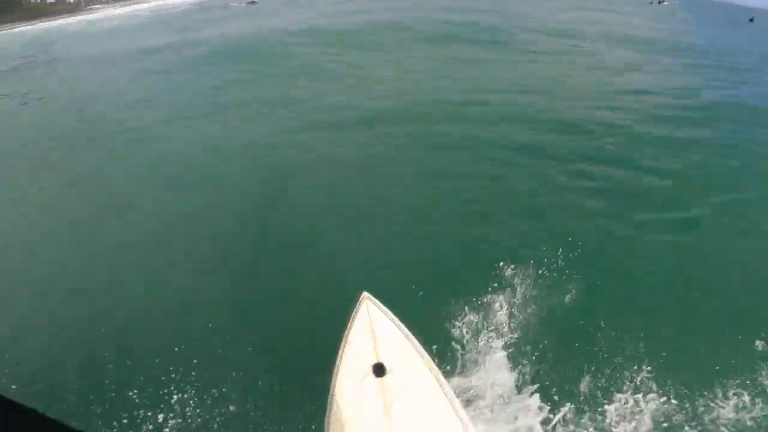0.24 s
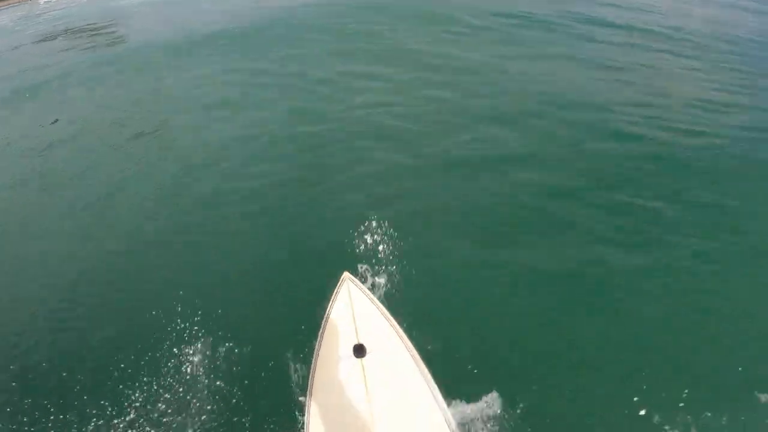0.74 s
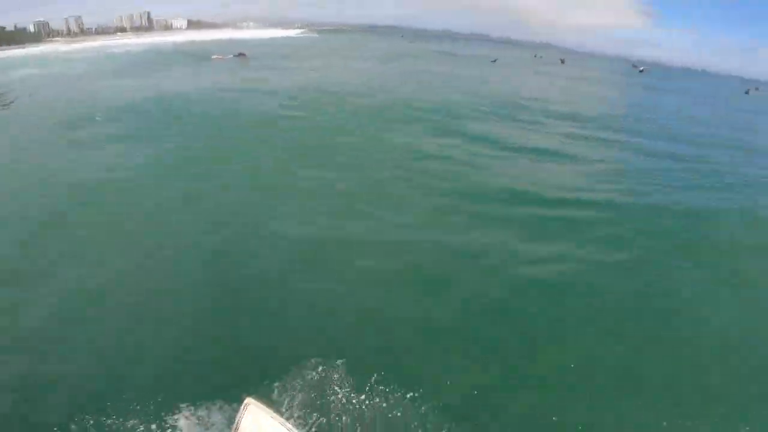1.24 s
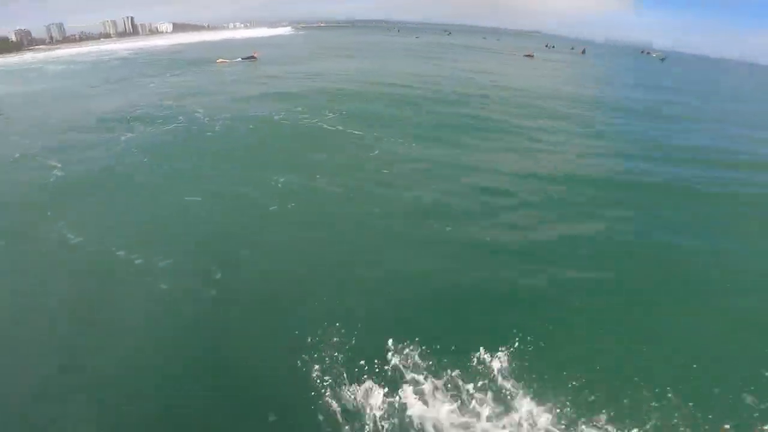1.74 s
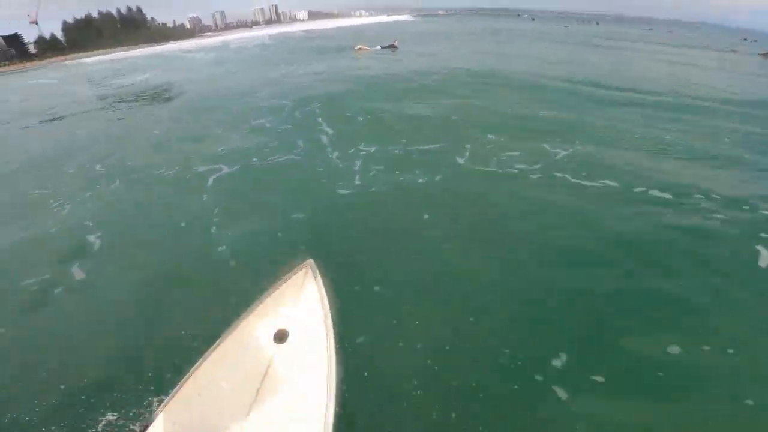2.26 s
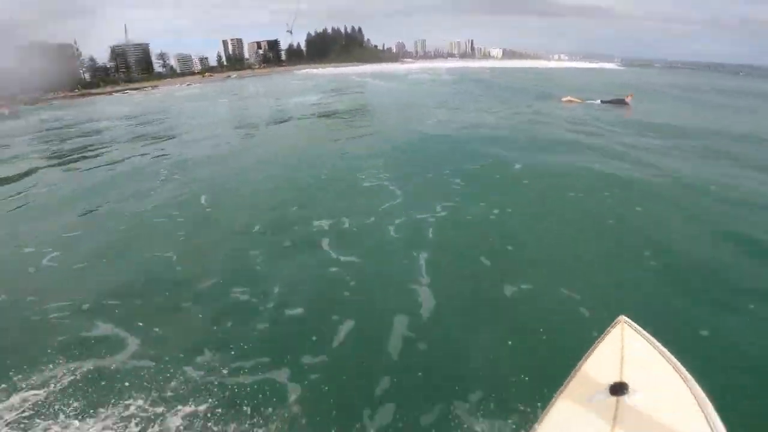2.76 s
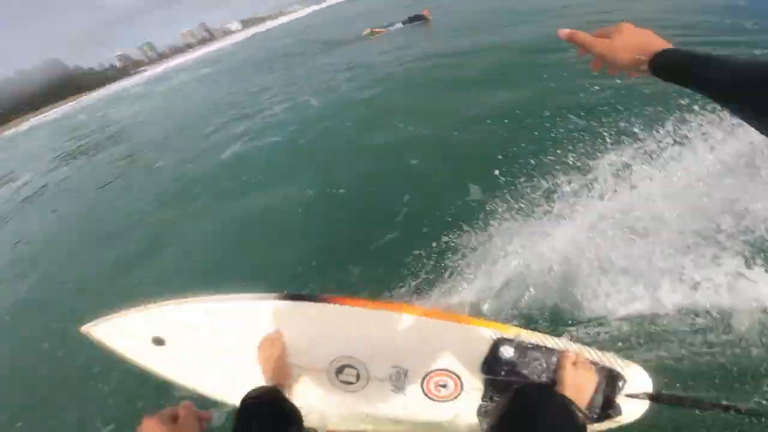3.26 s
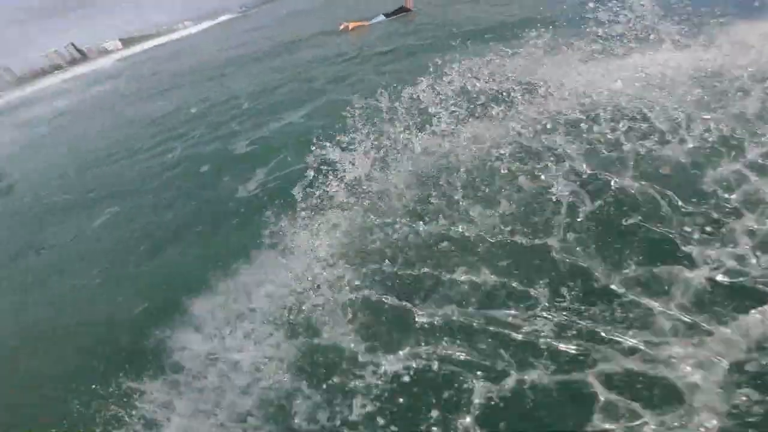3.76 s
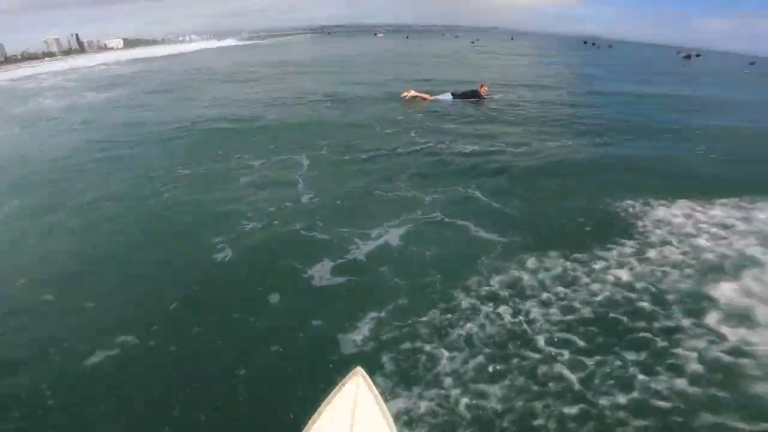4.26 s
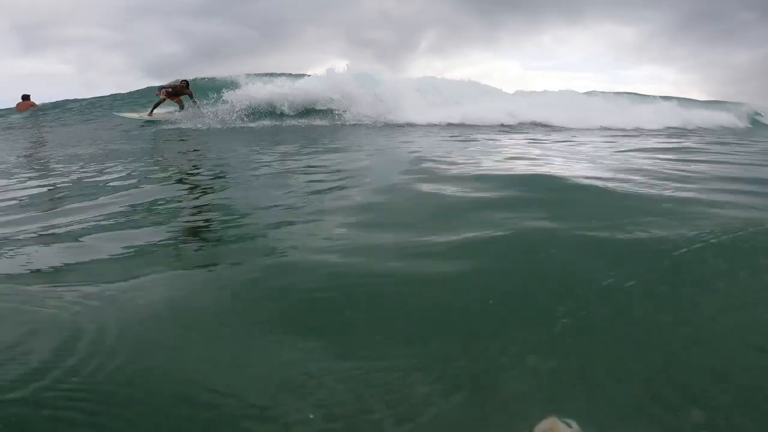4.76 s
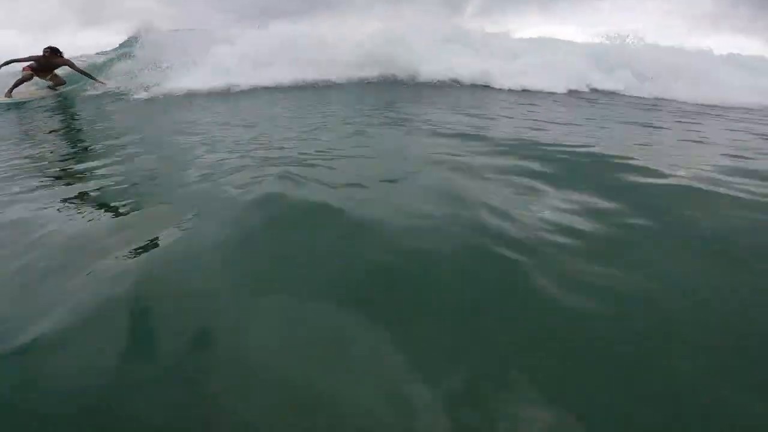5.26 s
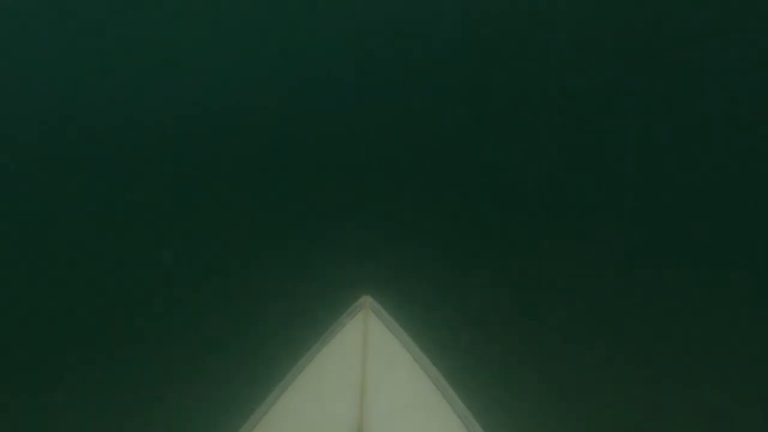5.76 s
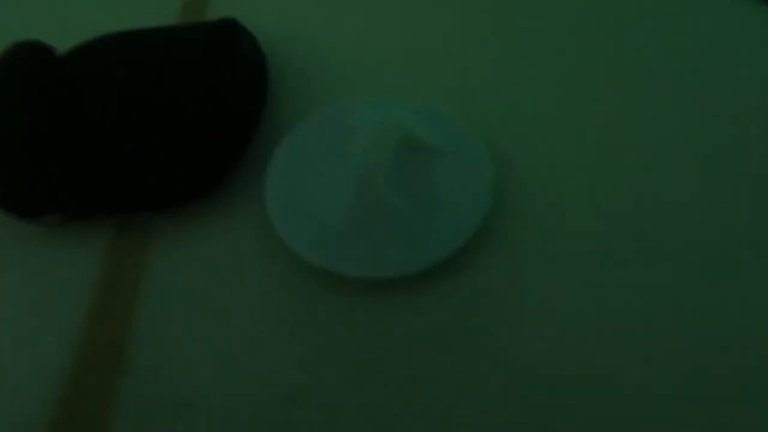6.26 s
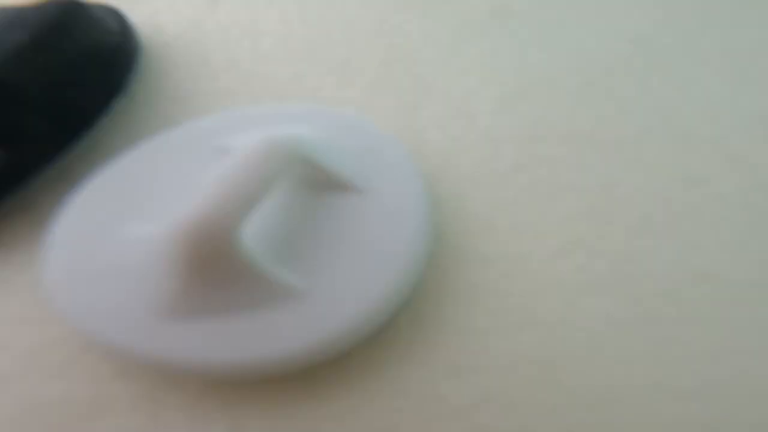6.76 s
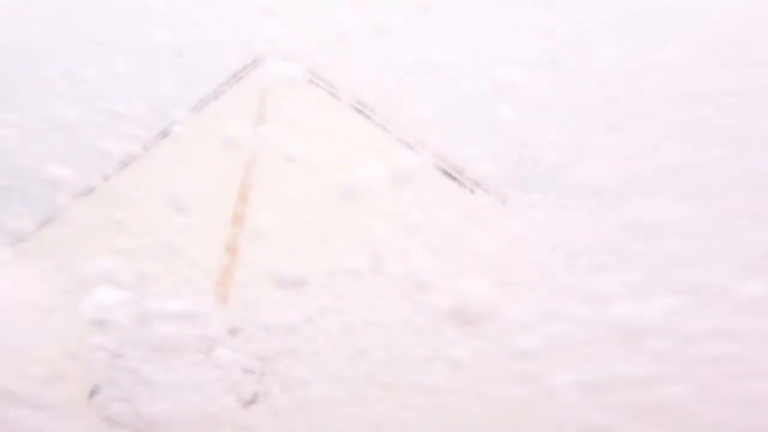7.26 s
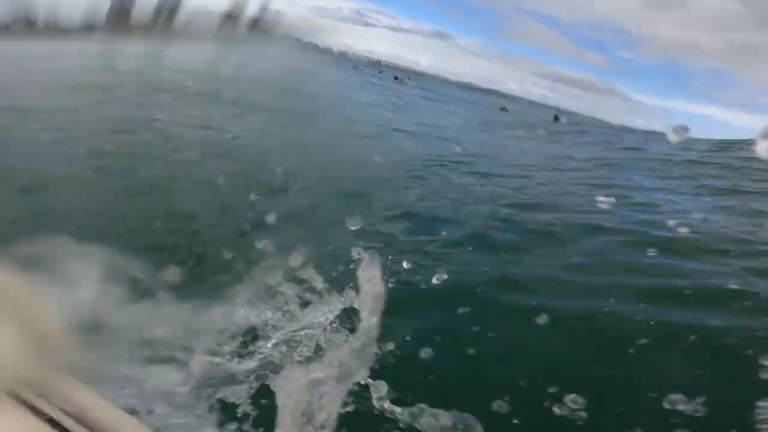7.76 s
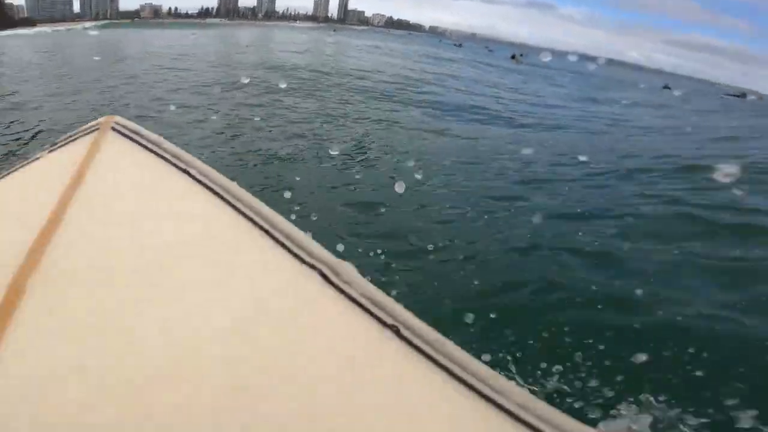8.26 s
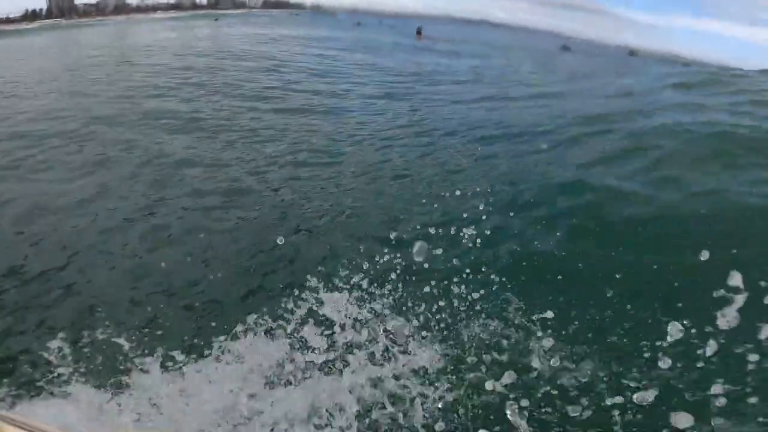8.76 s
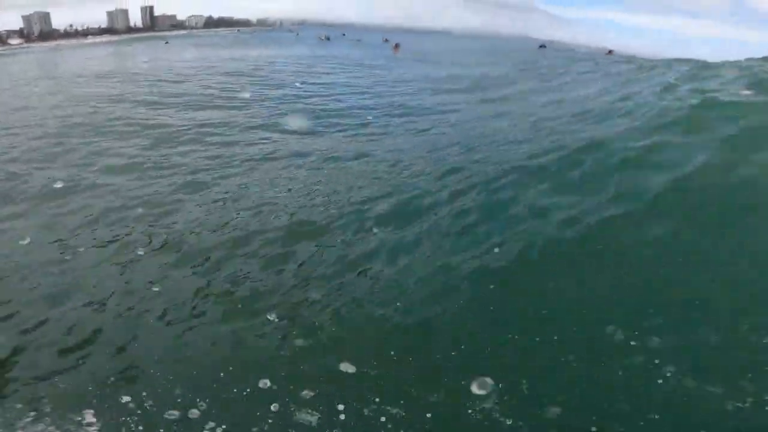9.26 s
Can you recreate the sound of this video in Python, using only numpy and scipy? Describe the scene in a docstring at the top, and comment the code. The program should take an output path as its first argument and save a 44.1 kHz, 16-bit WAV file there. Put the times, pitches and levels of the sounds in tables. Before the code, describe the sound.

Outdoors on the sea, right at the microphone: uneven wind thumps and rumbles under fizzing spray from a moving board. A burst of plops and slaps leads to denser rushing whitewater, then sudden submersion with bubbling, soft pops and hollow knocks, thinning in the middle and thickening on the way up. Finally open air again, blustery wind and wet splashes, hissing mainly on the right.

```python
"""Wind buffets the two microphone ports of a small camera that rides with a surfer; spray hisses off the board.
The camera then floats in front of a breaking wave, is pushed under it (muffled bubbling, ticks on the
housing) and surfaces into wind and splashes again. The left port is hollow and dull, the right one bright.
Wind and water are noise shaped by spectra and level curves; drops, bubbles and hoots are ringing or gliding
sines; knocks, thumps and slaps are short pulses and bursts."""
import sys
import numpy as np
from scipy import signal
from scipy.fft import rfft, irfft, next_fast_len
from scipy.io import wavfile
from scipy.ndimage import uniform_filter1d

SR = 44100
rng = np.random.default_rng(int(sys.argv[2]) if len(sys.argv) > 2 else 0)


def write(x):
    x = np.atleast_2d(x).T
    wavfile.write(sys.argv[1], SR, np.round(np.clip(x, -1, 1) * 32767).astype(np.int16))


N = 419391
T = np.arange(N) / SR   # s
SIZE = next_fast_len(N, real=True)   # transform length, samples
HZ = np.float32(np.maximum(np.arange(SIZE // 2 + 1) * SR / SIZE, 1))   # frequency of each bin

# The four stages: each from and to, in seconds.
RIDE, FLOAT, DIVE, PADDLE = (0, 4.48), (4.48, 5.715), (5.715, 7.617), (7.617, 9.52)

# All levels in the tables are relative; the functions set each layer's own level. Gusts of air and shoves of
# water. Each row: middle in seconds, length in seconds, lift in dB, pitch of their eddies in Hz, dB by which
# the spray dips during the gust.
GUST_ROWS = [(0.067, 0.125, 2.5, 560.0, 0.0), (0.386, 0.086, 2.0, 220.0, 2.5),
             (0.757, 0.079, 3.0, 70.0, 0.0), (0.924, 0.177, 4.5, 380.0, 9.0),
             (1.422, 0.074, 2.5, 160.0, 3.0), (1.575, 0.113, 4.5, 150.0, 0.0),
             (1.685, 0.11, 4.5, 150.0, 3.0), (2.001, 0.153, 2.0, 60.0, 0.0),
             (2.286, 0.114, 5.5, 190.0, 0.0), (2.44, 0.133, 4.5, 60.0, 0.0), (3.042, 0.102, 2.0, 70.0, 0.0),
             (3.229, 0.055, 5.0, 150.0, 0.0), (3.516, 0.111, 4.0, 220.0, 5.0),
             (3.599, 0.096, 4.5, 640.0, 1.5), (3.678, 0.061, 6.5, 80.0, 5.0),
             (3.808, 0.132, 5.5, 180.0, 3.0), (4.285, 0.121, 2.5, 530.0, 0.0),
             (4.581, 0.093, 3.5, 230.0, 0.0), (4.68, 0.055, 7.0, 80.0, 1.5), (5.825, 0.14, 6.5, 500.0, 0.0),
             (6.194, 0.08, 5.0, 70.0, 0.0), (6.393, 0.049, 3.5, 230.0, 0.0), (6.6, 0.3, 3.5, 60.0, 0.0),
             (6.679, 0.084, 5.0, 150.0, 0.0), (6.799, 0.152, 2.0, 740.0, 0.0),
             (6.987, 0.193, 5.5, 50.0, 0.0), (7.274, 0.12, 4.0, 140.0, 0.0), (7.505, 0.05, 5.0, 740.0, 0.0),
             (7.755, 0.07, 6.0, 140.0, 2.5), (7.942, 0.113, 4.0, 210.0, 0.0),
             (8.255, 0.144, 3.0, 60.0, 0.0), (8.733, 0.094, 4.0, 130.0, 0.0),
             (9.057, 0.086, 2.5, 140.0, 3.5), (9.115, 0.07, 4.5, 60.0, 0.0)]
# The flow breaks off for a moment. Each row: middle in seconds, length in seconds, dB lost, dB lost by the rumble.
LULL_ROWS = [(1.235, .055, 3, 1), (1.76, 0.033, 6, 9), (1.817, 0.096, 1, 6), (2.884, .119, 1.5, 4),
             (3.308, 0.058, 2.5, 10), (3.394, 0.032, 6, 8), (4.48, 0.01, 8, 5), (4.734, 0.079, 7, 6),
             (5.709, 0.021, 12, -2), (5.738, .012, 8, 4), (5.912, 0.02, 8, 0), (5.964, 0.013, 7, 1),
             (5.99, 0.14, 1, 4.5), (6.047, 0.029, 9, 7), (6.095, 0.019, 8, 4), (6.132, 0.014, 5, 1),
             (6.185, .014, 5, -2), (6.252, 0.029, 7, 3), (6.278, .01, 8, 2), (6.3, 0.035, 5, 0.5),
             (6.336, 0.018, 4, -2), (6.403, .012, 6, 3), (6.424, 0.041, 7, 5), (6.466, .018, 3, -1),
             (6.49, .012, 3, 3), (6.59, 0.023, 3, -1), (6.935, .085, 10.5, 1), (7.103, 0.023, 7, 2),
             (7.128, 0.03, 6, 9), (7.184, .012, 5, 0), (7.226, 0.02, 4, -1), (7.345, .016, 3, 2),
             (7.554, .03, 2, 1), (7.602, 0.029, 13, 12), (9.438, 0.19, 0.5, 3.5)]
# Bubbles that burst on the housing. Each row: time in seconds, tick level in dB, thud level in dB.
BURST_ROWS = [(5.750, -22, -30), (5.764, -21, -11), (5.812, -27, -11), (5.823, -31, -13), (5.853, -33, -14),
              (5.887, -25, -9), (5.895, -32, -15), (5.922, -41, -21), (5.950, -35, -17), (5.979, -31, -16),
              (6.009, -43, -13), (6.029, -43, -24), (6.042, -45, -26), (6.069, -36, -8), (6.11, -45, -19),
              (6.147, -40, -18), (6.164, -37, -9), (6.196, -45, -17), (6.213, -45, -19), (6.241, -47, -26),
              (6.268, -39, -13), (6.283, -47, -34), (6.318, -37, -9), (6.348, -47, -24), (6.376, -41, -8),
              (6.386, -42, -22.5), (6.409, -52, -20), (6.415, -56, -30), (6.433, -60, -30),
              (6.477, -66, -17), (6.502, -73, -20), (6.587, -60, -26), (6.604, -68, -17), (6.626, -57, -30),
              (6.665, -57, -33), (6.714, -67, -22), (6.756, -69, -21), (6.863, -34, -3), (6.913, -47, -24),
              (6.926, -55, -34), (6.982, -36, -16), (7.013, -34, -22), (7.028, -33.5, -24),
              (7.044, -33, -21), (7.064, -35, -27), (7.07, -37, -10.5), (7.083, -41, -27),
              (7.117, -58, -14), (7.192, -33, -8), (7.241, -34, -20), (7.247, -36, -24), (7.258, -34, -23),
              (7.274, -35, -15), (7.297, -36, -19), (7.308, -35, -21), (7.358, -47, -13), (7.377, -49, -16),
              (7.42, -49, -10), (7.445, -42, -16), (7.468, -43, -25), (7.488, -40, -18), (7.518, -35, -12)]
# Spectrum of the white water after surfacing. Each row: frequency in Hz, density in dB per Hz.
SURFACE_SPRAY = [(1000, -3.5), (1280, -10), (1900, -14.5), (2650, -13.5), (3100, -11), (3550, -14.5),
                 (4450, -10), (5500, -17.5), (6770, -21), (7400, -27.5), (8300, -37.5), (9500, -40),
                 (10500, -46), (12300, -53)]
# Spectrum of the bubbles under water. Each row: frequency in Hz, density in dB per Hz.
BUBBLE_COLOUR = [(600, -15), (900, -3), (1120, 2.5), (1300, -1), (1480, -10), (1700, -11), (2100, -20),
                 (2700, -28.5), (3600, -34.5), (4600, -38.5), (7000, -53), (10000, -70.5), (15000, -79)]
# Left port against the right one for sound through air. Each row: frequency in Hz, ratio in dB.
LEFT_THROUGH_AIR = [(1000, 10), (1400, 1), (2000, -1.5), (3000, -5), (3600, -7), (4300, -15.5),
                    (4750, -21.5), (5200, -49.5), (8000, -41)]
# Left port against the right one for sound through water. Each row: frequency in Hz, ratio in dB.
LEFT_THROUGH_WATER = [(800, 8.5), (1200, -1), (2000, -1), (4000, -5)]
# Phase by which the left port lags in air. Each row: frequency in Hz, lag in radians.
LAG_IN_AIR = [(170, -0.5), (400, 0.5), (600, 1.24), (790, 2.0), (1000, 4), (1400, 4.5), (2500, 4.7)]
# Phase by which the left port lags in water. Each row: frequency in Hz, lag in radians.
LAG_IN_WATER = [(120, -0.14), (300, -0.21), (650, 0.064), (950, -1.57)]
# Likeness of gusty flow at the two ports. Each row: frequency in Hz, shared amplitude 0-1.
GUSTY_LIKENESS = [(40, 0.63), (300, 0.51), (650, 0.72), (850, 0.43), (1200, 1)]


def flow(stage, levels, streams, colour, likeness, lag, top_hz, rumble_db, buffet_db, hollow_db, even_s=0.095):
    """Turbulence by eddy size: big eddies rumble, smaller ones buffet and excite the hollow port."""
    # The big eddies swing from port to port as the camera turns.
    # Each row: time in seconds, left against right in dB.
    rumble_side = [(0, -1), (.35, 3), (.62, -2.5), (.9, 1.5), (1.35, -3), (1.68, 6), (1.95, -2),
                   (2.23, -3.5), (2.7, 3.5), (3.1, -1), (3.83, 4.5), (4.1, -5.5), (4.4, -7.5), (4.65, 3.5),
                   (4.85, -1), (6.1, -1.5), (6.35, 4.5), (7.05, 5), (7.7, -2), (8.3, 1.5), (8.55, -5),
                   (8.95, -9), (9.1, -1), (9.5, -6)]
    rumble, buffet, side, hollow = levels
    spectra = ports(streams, in_hz(colour), in_hz(likeness)[0], lag) * below(top_hz, order=8)
    big, medium = below(113), below(396)
    low = play(spectra * big, rumble + rumble_db, 20, 120)
    middle = play(spectra * (medium - big), buffet + buffet_db, 140, 380, even_s)
    high = play(spectra * (1 - medium), hollow + hollow_db, 450, 1000, even_s)
    turned_low = ports_turned(in_time(rumble_side)[0], stage, 0.5) * low
    return turned_low + ports_turned(side, stage, 0.3) * (middle + high)


def wind_levels(rumble_hz, buffet_hz, hollow_hz, unrest_db):
    """One flow drives all its eddies: its gusts and lulls set rumble, buffeting, side and hollow port, in dB."""
    # Strength of the air or water that streams over the ports. Each row: time in seconds, level in dB.
    wind_curve = [(0.0, -23.5), (1.305, -25.0), (2.151, -27.0), (2.799, -26.5), (3.696, -26), (4.139, -29),
                  (4.741, -25.5), (5.085, -21.5), (5.66, -18), (5.829, -20), (5.991, -24), (6.896, -29),
                  (7.395, -21.5), (7.632, -27.5), (8.522, -27.0), (9.051, -23), (9.51, -22)]
    # The side that faces the flow. Each row: time in seconds, left against right in dB.
    facing_curve = [(0.0, 5), (0.6, 3.5), (0.9, 5), (1.15, 3), (1.6, 6), (2.25, 3), (2.85, 2), (3.3, 4),
                    (3.8, 6), (4.05, 2.5), (4.4, 2), (5.5, 1.5), (5.8, 10.5), (6.05, 2.5), (6.35, 11),
                    (7.05, 11.5), (7.17, 2), (7.5, 3), (7.8, 13), (8.15, 9.5), (8.9, 9), (9.51, 8.5)]
    usual_wind_db = -25   # at this strength rumble and hollow port have the base levels below
    rumble_base_db, rumble_follows = -23, 0.13   # the second is the share of the wind's swing they follow
    hollow_base_db, hollow_follows = -28, 0.5
    gust_turn = 0.32   # dB towards the left port for each dB of gust

    (wind,), (facing,) = in_time(wind_curve), in_time(facing_curve)
    swing = wind - usual_wind_db
    lull = swells(row[:3] for row in LULL_ROWS)
    rumble_lull = swells((s, length, lost) for s, length, _, lost in LULL_ROWS)
    gust = gusts_at(buffet_hz)
    rumble = rumble_base_db + rumble_follows * swing + gusts_at(rumble_hz) - rumble_lull
    buffet = wind + gust - lull + unrest_db * drift(10)
    hollow = hollow_base_db + hollow_follows * swing + gusts_at(hollow_hz) - lull
    return rumble, buffet, facing + gust_turn * gust, hollow


def gusts_at(hz):
    """A gust lifts eddies near its own pitch most, along a bell curve in octaves; lift in dB."""
    spread_octaves = 0.95
    return swells((s, length, db * np.exp(-(np.log2(hz / eddy_hz) / spread_octaves) ** 2 / 2))
                  for s, length, db, eddy_hz, _ in GUST_ROWS)


def eddies(lumpy_db, rate):
    """Intermittent turbulence: two unrelated noise streams that come in the same lumps."""
    return rng.standard_normal((2, N)) * from_db(lumpy_db * drift(rate))


def ports_turned(side_db, stage, left_share):
    """Level difference between ports: their gains as the flow swings away from its mean side in a stage."""
    turn_db = side_db - np.average(side_db, weights=during(stage))
    return from_db(np.array([[left_share], [left_share - 1]]) * turn_db)


def hoots():
    """Vortex shedding: the wind sheds regular vortices off the camera and hoots briefly."""
    # Each row: middle in seconds, length in seconds, level in dB, Hz at the start and at the end of that length.
    whirl_rows = [(0.78, .05, -17.5, 70, 120), (0.83, .06, -20, 209.6, 222), (0.92, .05, -21.5, 241.6, 271),
                  (1.16, .07, -21, 317.5, 495), (1.575, .06, -18.5, 290, 197),
                  (1.61, .04, -17.5, 109.6, 130), (1.675, .06, -17.5, 215.8, 181),
                  (1.705, 0.0502, -15, 109.3, 95), (3.68, 0.055, -18, 130, 110.7),
                  (7.81, .04, -21, 293, 261), (7.875, .03, -21.5, 200, 210), (7.93, .04, -20.5, 788, 853),
                  (7.97, .05, -19.5, 279, 267)]
    return gliding_tones(whirl_rows, level_db=1.5, lag=LAG_IN_AIR, wobble=0.06, flutter_db=3.0)


def white_water(levels, colour, drops, drop_db, flicker_db, splash_db, spray_db):
    """Many small impacts add up to noise: droplets over a hiss, coarse splashes lower than fine spray."""
    splash, spray = levels
    hiss = rng.standard_normal((2, N))
    streams = (hiss + from_db(drop_db) * drops) * from_db(flicker_db * drift(35))
    colour_db = in_hz(colour) + in_hz(LEFT_THROUGH_AIR) * [[1], [0]]
    spectra = ports(streams, colour_db, 0.9, LAG_IN_AIR) * (1 - below(920))
    coarse = below(2530, order=8)
    splashes = play(spectra * coarse, splash + splash_db, 1300, 2400)
    return splashes + play(spectra * (1 - coarse), spray + spray_db, 2800, 7500)


def water_levels(unrest_db):
    """Splash and spray in dB: both dip while gusts blow and rise in surges, the coarse splash most."""
    # Hiss of the white water, before and after the dive. Each row: time in seconds, level in dB.
    spray_curve = [(0.0, -32.0), (0.752, -30), (1.252, -31.5), (1.769, -40), (1.95, -32.0), (2.545, -33.0),
                   (2.84, -28), (3.399, -28.5), (3.47, -31), (3.861, -29.5), (4.046, -25.5), (4.449, -30),
                   (4.76, -32), (4.85, -26.5), (5.653, -25.5), (5.715, -44), (7.62, -40), (7.796, -38),
                   (8.124, -33), (8.651, -32), (9.201, -34.0), (9.51, -39.0)]
    # Sheets of water thrown up by the board or the wave. Each row: middle in seconds, length in seconds, lift in dB.
    surge_rows = [(0.182, 0.042, 4), (0.295, 0.062, 1), (0.593, 0.053, 2.5), (1.125, 0.15, 2.5),
                  (1.536, 0.16, 1), (1.914, 0.096, 3), (2.153, 0.12, 3), (2.462, 0.11, 3.5),
                  (2.651, 0.059, 4), (4.534, 0.055, 3), (4.619, 0.045, 4.5), (4.793, 0.023, 2),
                  (7.63, 0.053, 4.5), (7.74, 0.034, 5), (8.318, 0.071, 3.5), (8.612, 0.088, 2),
                  (8.962, 0.064, 2), (9.111, 0.049, 1.5), (9.211, 0.048, 2)]
    coarse_db, coarse_in_surge = -9.5, 0.59   # splash against spray; extra dB for each dB of surge

    (spray,), surge = in_time(spray_curve), swells(surge_rows)
    receding = swells((s, length, max(lost, 0)) for s, length, _, _, lost in GUST_ROWS)
    spray = spray + surge - receding + unrest_db * drift(7.9)
    return spray + coarse_db + coarse_in_surge * surge, spray


def droplets():
    """Random impacts: fine drops fall all the time, heavy ones crackle where water breaks up close by."""
    # Each row: middle in seconds, length in seconds, lift of the heavy drops in dB.
    splatter_rows = [(1.12, 0.16, 11), (2.88, .2, 9.5), (4.62, .28, 15), (8.5, .5, 7)]
    heavy_db = -8.5   # heavy drops against fine ones, outside the splatters
    fine = grains(per_s=2200, low_hz=1200, high_hz=7110, cycles=10.2, spread_db=4.0)
    heavy = grains(per_s=420, low_hz=1200, high_hz=7000, cycles=6.3, spread_db=3.0, count=8)
    drops = fine + from_db(heavy_db + swells(splatter_rows)) * heavy
    return np.array([drops, np.roll(drops, SR // 50)])


def plops(level_db):
    """Bubble resonance: each drop traps a bubble that rings and glides; high ones reach mostly the right port."""
    # Each row: start in seconds, level in dB, pitch in Hz, cycles until the ring is 60 dB down,
    # pitch glide as a share.
    plop_rows = [(2.022, -19, 1490, 12, -0.054), (4.493, -11, 4580, 22, -0.0098),
                 (4.504, -9, 3540, 24, -0.0086), (4.527, -10, 3190, 26, .05), (4.539, -13.5, 1276, 22, .14),
                 (4.546, -11, 5000, 24, -0.029), (4.556, -6.5, 4700, 18, 0.011),
                 (4.563, -21, 800, 9.1, .05), (4.572, -15, 5650, 18, .05), (4.603, -10, 4000, 22, .05),
                 (4.613, -15.5, 1150, 11, .05), (4.629, -8, 3850, 30, .05), (4.634, -12, 5700, 16, .05),
                 (4.655, -18, 5600, 18, .05), (4.667, -15, 4300, 18, .05), (4.675, -14.5, 3600, 28, .05),
                 (4.697, -17, 5000, 22, 0.02), (4.64, -5.5, 4290, 30, .05), (4.709, -4, 3800, 29, .05),
                 (4.723, -12.5, 5220, 16, 0.11), (5.664, -18, 4020, 34, 0.1),
                 (5.701, -25.5, 3170, 140, -0.36), (5.751, -12.5, 1900, 7.2, .08),
                 (5.759, -14.5, 2110, 9.9, 0.14), (5.764, -4, 1380, 14, .08),
                 (5.785, -12, 1154, 14, -0.022), (5.979, -9.5, 1300, 18, -0.067),
                 (6.028, -14, 2320, 16, -0.02), (6.146, -12, 1570, 24, 0.052),
                 (6.241, -18.5, 1550, 12, .03), (6.268, -15, 1145, 15, 0.0023),
                 (6.321, -25.5, 1100, 14, .03), (6.626, -23.5, 1700, 19, 0.01),
                 (6.665, -24, 1680, 23, -0.028), (6.736, -44.5, 2600, 27, 0.0052),
                 (6.86, -18.5, 1250, 10, -0.01), (7.168, -17.5, 1300, 20, .05),
                 (7.266, -21.5, 2240, 20, .05), (7.327, -11, 1680, 20, 0.0037), (7.359, -16, 1150, 16, .05),
                 (7.374, -17.5, 1200, 16, .05), (7.402, -17.5, 1170, 16, .05),
                 (7.445, -11, 1360, 20, -0.034), (7.469, -11.5, 1200, 16, .03),
                 (7.508, -10, 1135, 18, -0.034), (7.578, -15, 1200, 18, 0.0069),
                 (7.625, -16.5, 820, 16, .08), (7.661, -12, 613, 5.5, -0.027),
                 (8.032, -13.5, 4380, 33, -0.094), (8.115, -20.5, 3100, 26, .05),
                 (8.441, -10.5, 4590, 49, .05), (8.578, -19, 4480, 30, .05), (8.628, -14, 4600, 36, .05),
                 (8.68, -17, 3150, 30, .05), (9.17, -21, 3000, 30, .05), (9.205, -18.5, 2900, 28, .05)]
    out, t = np.zeros(N), T[:SR // 10]
    for s, db, hz, cycles, glide in plop_rows:
        start, age = round(s * SR), t * hz / cycles
        gliding_hz = hz * (1 + glide * np.minimum(4 * age, 1))   # levels off after a quarter of the ring
        phase = 2 * np.pi * np.cumsum(gliding_hz) / SR
        onset = (1 - np.exp(-25 * age)) ** 2
        out[start:start + len(t)] += from_db(db + level_db - 60 * age) * onset * np.sin(phase)
    return drops_at_ports(out)


def slaps(level_db):
    """Impulsive noise: sheets of water slap the camera in short bursts of spray that die at once."""
    # Each row: start in seconds, level in dB, decay in seconds.
    slap_rows = [(1.048, -32, .035), (2.11, -35, .02), (2.345, -35, 0.013), (4.49, -23, 0.011),
                 (4.555, -20, .003), (4.604, -24, 0.014), (4.638, -21, 0.0034), (5.662, -22.5, .01),
                 (7.618, -22.5, 0.0082), (8.437, -25, 0.0069)]
    rise_s = 0.0037
    strength = np.zeros(N)
    for s, db, decay in slap_rows:
        fade = np.exp(-np.minimum(np.abs(T - s) / decay, 20))
        strength += from_db(db + level_db) * np.clip((T - s) / rise_s, 0, 1) * fade
    colour_db = in_hz(SURFACE_SPRAY) + in_hz(LEFT_THROUGH_AIR) * [[1], [0]]
    spectra = ports(rng.standard_normal((2, N)), colour_db, 0.72, LAG_IN_AIR)
    return strength * rms_one(irfft(spectra * (1 - below(1800)), SIZE)[:, :N])


def showers(level_db, pitch_spread):
    """Like-sized drops ring alike: each shower is a short patter around one pitch."""
    # Each row: middle in seconds, length in seconds, level in dB, pitch in Hz.
    shower_rows = [(7.738, 0.032, -34.5, 3920), (7.98, .07, -32, 3780), (8.118, .03, -31, 5080),
                   (8.216, .035, -33.5, 3100), (8.318, .06, -40, 1890), (8.422, .04, -34, 1390),
                   (8.625, .06, -30.5, 4770), (8.65, .08, -34.5, 3200), (8.89, 0.046, -34.5, 3100),
                   (8.985, 0.046, -33, 2910), (9.09, .045, -31.5, 3100), (9.11, .035, -34, 4200)]
    patter = np.zeros(N)
    for s, length, db, hz in shower_rows:
        drops = grains(per_s=900, low_hz=hz / pitch_spread, high_hz=hz * pitch_spread,
                       cycles=22, spread_db=2.5, count=3)
        patter += from_db(db + level_db) * swells([(s, length, 1)]) * drops
    return drops_at_ports(patter)


def drops_at_ports(x):
    """Fully coherent sound through air: one signal reaches both ports with their difference in level and phase."""
    spectra = ports([x, x], in_hz(LEFT_THROUGH_AIR) * [[1], [0]], 1, LAG_IN_AIR)
    return irfft(spectra * below(7000, order=8), SIZE)[:, :N]


def thumps(level_db):
    """Pressure pulse: a lump of air or water on the ports is one push with a rebound on either side."""
    # Each row: middle in seconds, level in dB, width in seconds.
    thump_rows = [(3.266, -9, 0.0023), (3.368, -6.5, 0.0014), (3.439, -13, 0.0018), (5.728, -2, 0.00042),
                  (5.744, -8, 0.0012)]
    out = np.zeros(N)
    for s, db, width in thump_rows:
        near = np.abs(T - s) < 10 * width
        spread = ((T[near] - s) / width) ** 2 / 2
        out[near] += from_db(db + level_db) * (1 - spread) * np.exp(-spread)
    return out


def under_water(levels, puff_share):
    """Pressure of bursting bubbles: the same flow under water, where each burst also shoves the ports."""
    rumble, buffet, side, hollow = levels
    shove = puff_share * puffs()
    return rumble, buffet + shove, side, hollow + shove


def gurgle(level_db):
    """Volume resonance: countless lesser pockets of air wobble in the wave as low blurps."""
    pockets = grains(per_s=260, low_hz=194.6, high_hz=875, cycles=9.5, spread_db=2.5, count=8)
    return from_db(level_db) * np.array([pockets, np.roll(pockets, SR)])


def churned_air(level_db, froth_db):
    """Bubble pitch rises with pressure: clumps ring higher at depth, flare at each burst and lack treble."""
    # Air churned under the wave, thick on the way down and up, thin at depth.
    # Each row: time in seconds, level in dB.
    churn_curve = [(5.735, -32), (5.755, -25), (5.89, -25), (6.0, -30), (6.22, -36), (6.3, -44),
                   (6.45, -55), (6.94, -57.5), (7.03, -41), (7.2, -33.5), (7.42, -30), (7.51, -22),
                   (7.6, -34)]
    # Ringing pitch, higher at depth where the bubbles are squeezed small. Each row: time in seconds, pitch in Hz.
    pitch_curve = [(5.78, 1057), (5.9, 1120), (6.0, 1272), (6.15, 1421), (7.17, 1401), (7.3, 1338),
                   (7.4, 1190), (7.52, 1090)]
    shallow_hz = 1120   # pitch at which the bubbles have their listed colour
    thick_db, thin_db = -13, -46   # a puff is lost in thick churn and stands out fully in thin
    lull_share = 0.6   # bubbles outlast a lull

    churn, = in_time(churn_curve)
    exposed = np.clip((thick_db - churn) / (thick_db - thin_db), 0, 1)
    level = churn - lull_share * swells(row[:3] for row in LULL_ROWS) + puffs() * exposed
    cloud = grains(per_s=900, low_hz=853, high_hz=2190, cycles=12.3, spread_db=4.0, count=10)
    froth = from_db(froth_db) * eddies(lumpy_db=3.5, rate=100)
    streams = (np.array([cloud, cloud[::-1]]) + froth) * from_db(2.2 * drift(47))
    spectra = bubbles_at_ports(streams) * below(2200, order=12)
    squeezed = sped_up(spectra, in_time(pitch_curve)[0] / shallow_hz) * below(1850, order=12)
    return play(squeezed, level + level_db, 944, 1900, even_s=0.05)


def puffs():
    """Bubble release: each burst sheds a puff that starts at once and fades; the strongest counts, lift in dB."""
    lift_db, rise_s, decay_s = 11, 0.002, 0.012
    loud_thud_db, per_thud = -7, 0.34   # thud level that gives lift_db; change in dB for each dB of thud
    t = T[::40]
    lifts = []
    for s, _, thud in BURST_ROWS:
        lift = max(lift_db + per_thud * (thud - loud_thud_db), 0)
        lifts.append(lift * np.clip((t - s) / rise_s + 1, 0, 1) * np.exp(-np.abs(t - s) / decay_s))
    return np.interp(T, t, np.max(lifts, axis=0))


def fizz(level_db, pops_per_s, spread_db, froth_db, ringing_db):
    """Random pops: tiny bubbles burst one by one on the housing, among small ringing ones and a faint froth."""
    # Each row: time in seconds, level in dB.
    fizz_curve = [(5.735, -45), (5.76, -37), (5.885, -41.5), (5.91, -50.5), (6.06, -55), (6.11, -54),
                  (6.17, -51), (6.23, -57), (6.26, -66), (6.4, -66), (6.5, -80), (6.83, -83), (6.87, -76),
                  (6.96, -78), (7.0, -68), (7.11, -65), (7.14, -58), (7.27, -51), (7.455, -60.5),
                  (7.47, -46), (7.52, -46), (7.6, -62)]
    pops = (rng.random(N) < pops_per_s / SR) * from_db(spread_db * np.minimum(rng.exponential(1, N), 3))
    popping = rms_one(np.array([crackle(pops + 1e-18), crackle(pops + 1e-18)]))
    small = grains(per_s=700, low_hz=2050, high_hz=2750, cycles=14, spread_db=3.0, count=3)
    froth = from_db(froth_db) * rng.standard_normal((2, N))
    spectra = bubbles_at_ports(popping + from_db(ringing_db) * small + froth)
    return play(spectra * (1 - below(1840, order=12)), in_time(fizz_curve)[0] + level_db, 2290, 3600, even_s=0.03)


def bubbles_at_ports(streams):
    """Partial coherence through water: spectra of bubble sound at the two ports."""
    colour_db = in_hz(BUBBLE_COLOUR) + in_hz(LEFT_THROUGH_WATER) * [[1], [0]]
    return ports(streams, colour_db, 0.81, LAG_IN_WATER)


def ticks(tick_db, thud_db, port_hz, housing_hz):
    """Struck resonators: a bursting bubble ticks dully and knocks the case and the hollow left port."""
    s, tick, thud = np.transpose(BURST_ROWS)
    at = np.round(s * SR).astype(int)
    bursts = np.bincount(at, from_db(tick + tick_db), N) + 1e-18
    dull = cut(cut(crackle(bursts), 1700, "low", order=1), 6900, "low", order=10)
    crack = dull + 0.17 * ring(bursts, housing_hz, cycles=8.4)
    knocks = cut(np.bincount(at, from_db(thud + thud_db), N) + 1e-18, 1200, "low", order=2)
    knock = ring(knocks, port_hz, cycles=10.2) + 0.43 * ring(knocks, 380, cycles=4)
    return crack * from_db([[0], [-2.5]]) + knock * from_db([[3], [-7]])


def glugs():
    """Volume resonance: big pockets of air wobble in the water as gliding tones."""
    # Each row: middle in seconds, length in seconds, level in dB, Hz at the start and at the end of that length.
    glug_rows = [(5.79, .02, -18, 1048, 900), (5.822, .03, -14, 337, 260), (5.925, .02, -21, 555, 522),
                 (5.938, .008, -19.5, 622, 580), (5.952, .012, -20, 1050, 955),
                 (5.96, .008, -17.5, 558, 600), (6.013, .012, -21.5, 624, 600),
                 (6.073, .014, -22.5, 802, 852), (6.11, .016, -23, 448, 402), (6.168, .02, -15, 772, 700),
                 (6.205, 0.0221, -20, 517, 553), (6.215, 0.011, -22, 980, 924),
                 (6.322, .016, -24, 720, 743), (6.378, .02, -18, 326, 342), (6.412, .014, -27, 800, 782),
                 (6.48, .011, -21.5, 622, 600), (6.507, .02, -23.5, 700, 680), (6.527, .025, -20, 328, 391),
                 (6.551, .018, -19, 638, 500), (6.675, .07, -18, 230, 270), (6.735, .025, -23.5, 680, 740),
                 (6.761, .016, -21, 620, 580), (6.8, 0.05, -23.5, 688, 750), (6.842, .02, -24.5, 627, 600),
                 (6.985, .013, -21, 516, 636), (7.015, .02, -25, 700, 756), (7.071, .016, -20, 638, 668),
                 (7.12, .013, -23, 680, 700), (7.165, .02, -22, 422, 500), (7.196, .018, -23, 727, 700),
                 (7.26, 0.054, -18.5, 170, 200), (7.315, .03, -17, 201.5, 171),
                 (7.364, .014, -23, 650, 600), (7.383, .012, -16.5, 480, 520),
                 (7.42, .016, -18, 1200, 1294), (7.452, 0.028, -17.5, 230, 180.5),
                 (7.49, .02, -17.5, 1153, 1100), (7.514, .02, -16, 1215, 1100),
                 (9.124, .021, -20, 1250, 1700)]
    return gliding_tones(glug_rows, level_db=0.5, lag=LAG_IN_WATER, wobble=0.031, flutter_db=2.0)


def trapped_air(hz, level_db):
    """Forced resonance: a bubble caught in a port is shaken by the flow and rings faintly at one pitch."""
    shaking = rng.standard_normal(N) * from_db(4 * drift(rate=20))
    return from_db(level_db) * rms_one(ring(ring(shaking, hz, cycles=19), hz, cycles=19))


def gliding_tones(rows, level_db, lag, wobble, flutter_db):
    """Frequency modulation: each tone swells and fades as it glides, never quite steady in pitch or strength."""
    # Left port against the right one for glugs and hoots. Each row: frequency in Hz, ratio in dB.
    left_in_bass = [(100, 2), (300, 7.5), (750, 15), (1150, 1.5)]
    out, bend, flutter = np.zeros(N), 1 + wobble * drift(60), from_db(flutter_db * drift(80))
    for (s, length, db, from_hz, to_hz), turn in zip(rows, rng.random(len(rows))):
        near = slice(*np.searchsorted(T, [s - length, s + length]))
        age = (T[near] - s) / length
        hz = from_hz * (to_hz / from_hz) ** (age + 0.5) * bend[near]
        envelope = np.cos(np.pi / 2 * age) ** 2   # at half height for the given length
        out[near] += from_db(db + level_db) * envelope * np.sin(2 * np.pi * (turn + np.cumsum(hz) / SR))
    left_db = in_hz(left_in_bass)
    spectra = ports([out * flutter] * 2, left_db * [[1], [0]], 1, lag)
    shares = 2 / (1 + from_db(left_db[0])) * spectra   # the mean gain of the two ports stays 1
    return irfft(shares, SIZE)[:, :N]


def grains(per_s, low_hz, high_hz, cycles, spread_db, count=16):
    """Shot noise: drops or bubbles of random size and pitch swell and fade, about equally strong per Hz."""
    at = np.flatnonzero(rng.random(N) < per_s / SR)
    sizes_db = spread_db * np.minimum(rng.exponential(1, len(at)), 3.5)
    sizes = from_db(sizes_db) * rng.choice([-1, 1], len(at))
    dealt, out = rng.integers(0, count, len(at)), np.zeros(N)
    for k, hz in enumerate(np.geomspace(low_hz, high_hz, count)):
        r, w = from_db(-60 * hz / (cycles * SR)), 2 * np.pi * hz / SR
        poles = [1, -2 * r * np.cos(w), r * r]   # applied twice, so that each ring starts softly
        clicks = np.bincount(at, sizes * (dealt == k), N) + 1e-18
        out += signal.lfilter([(hz * np.sin(w)) ** 2], np.convolve(poles, poles), clicks)
    return rms_one(out)


def crackle(clicks):
    """Exponential decay: each click becomes a short dying crackle of the same mean energy."""
    decay_s = 0.0014
    r = np.exp(-1 / (decay_s * SR))
    return signal.lfilter([np.sqrt(1 - r * r)], [1, -r], clicks) * rng.standard_normal(N)


def ring(clicks, hz, cycles):
    """Damped resonance: a unit click starts a sine of initial height 1, 60 dB down after so many cycles."""
    r, w = from_db(-60 * hz / (cycles * SR)), 2 * np.pi * hz / SR
    return signal.lfilter([0, np.sin(w)], [1, -2 * r * np.cos(w), r * r], clicks + 1e-18)


def ports(streams, colour_db, alike, lag):
    """Partial coherence: two streams become the port spectra, partly shared, shifted in phase, coloured."""
    shared, own = rfft(np.float32(streams), SIZE)
    alike, angle = np.float32(np.clip(alike, 0, 1)), np.float32(in_hz(lag)[0])
    mixed = alike * shared + np.sqrt(1 - alike ** 2) * own
    left = mixed * (np.cos(angle) - 1j * np.sin(angle))
    return np.array([left, shared]) * from_db(np.float32(colour_db))


def play(spectra, level_db, low_hz, high_hz, even_s=0.099):
    """Band power control: back to sound, whose strength between two frequencies follows a level curve."""
    spectra = spectra.astype(np.complex64)
    band = (HZ > low_hz) & (HZ < high_hz)
    core = irfft((spectra[0] + spectra[1]) / 2 * band, SIZE)[:N]
    power = uniform_filter1d(uniform_filter1d(core ** 2, int(even_s * SR)), int(even_s * SR / 2))
    return irfft(spectra, SIZE)[:, :N] * (from_db(level_db) / np.sqrt(np.abs(power) + 1e-20))


def sped_up(spectra, speed):
    """Time scaling: the same sound runs at a changing speed, so that all its pitches move together."""
    clock = np.cumsum(speed) / SR % T[-1]
    return rfft(np.float32([np.interp(clock, T, x[:N]) for x in irfft(spectra, SIZE)]), SIZE)


def below(hz, order=6):
    """Soft crossover: the share of each bin that lies under a frequency."""
    return 1 / (1 + np.minimum(HZ / hz, 20) ** order)


def cut(x, hz, kind, order=2):
    """Maximally flat filter: a low-pass or high-pass."""
    return signal.sosfilt(signal.butter(order, hz, kind, fs=SR, output="sos"), x)


def drift(rate):
    """Low-passed noise: slow chance of spread 1, with a rate in Hz."""
    r = np.exp(-80 * np.pi * rate / SR)   # computed at every 40th sample
    slow = signal.lfilter([1], [1, -2 * r, r * r], rng.standard_normal(N // 40 + 2002))[2000:]
    return np.interp(np.arange(N) / 40, np.arange(len(slow)), rms_one(slow))


def swell(middle_s, length_s):
    """Bell-shaped envelope: a smooth rise and fall, at half height for the given length."""
    return np.exp(-np.log(2) * np.minimum(np.abs(2 * (T[::40] - middle_s) / length_s), 4) ** 3)


def swells(rows):
    """Superposition: the sum of (middle s, length s, dB) swells, sample by sample."""
    return np.interp(T, T[::40], sum(db * swell(s, length) for s, length, db in rows))


def during(stage):
    """Crossfade window: one inside a stage, zero outside, with 6 ms fades."""
    return np.clip(np.minimum(T - stage[0], stage[1] - T) / 0.006 + 0.5, 0, 1)


def in_time(rows):
    """Linear interpolation: each column of a curve, sample by sample."""
    s, *columns = np.transpose(rows)
    return [np.interp(T, s, c) for c in columns]


def in_hz(rows):
    """Interpolation over log frequency: each column of a spectrum, bin by bin."""
    hz, *columns = np.transpose(rows)
    return np.array([np.interp(np.log(HZ), np.log(hz), c) for c in columns])


def from_db(db):
    """Logarithmic level: decibels to gain."""
    return np.exp(np.asarray(db) * (np.log(10) / 20))


def rms_one(x):
    """Normalised power: the same sound with an rms of 1."""
    return x / np.sqrt(np.mean(x ** 2) + 1e-20)


def ride(wind, air, water, drops):
    """Turbulent flow over the ports plus impact noise: wind and spray on the board."""
    # Each row: frequency in Hz, left level in dB, right level in dB.
    wind_colour = [(12, 0, -7), (25, -1, -0.5), (45, -0.5, -0.5), (84, -2.5, 0.5), (130, -1, -5),
                   (210, -2.5, -6.5), (303, -5.5, -12.5), (472, -12, -15.5), (575, -7.5, -18.5),
                   (650, -12, -19), (742, -7, -22), (946, -20.5, -29), (1200, -27, -26)]
    # Each row: frequency in Hz, density in dB per Hz.
    spray_colour = [(1000, 0.5), (1200, -1.5), (1680, -5.5), (2060, -7), (2500, -7), (3120, -3.5),
                    (4190, -2), (5000, -9), (5700, -12.5), (6900, -15), (7500, -21), (8400, -36),
                    (10400, -45.5), (12300, -49)]
    out = flow(RIDE, wind, air, wind_colour, GUSTY_LIKENESS, LAG_IN_AIR,
               top_hz=1250, rumble_db=1.0, buffet_db=-0.5, hollow_db=2)
    return out + white_water(water, spray_colour, drops,
                             drop_db=-10.5, flicker_db=1.0, splash_db=0.0, spray_db=-0.5)


def afloat(wind, water, drops):
    """Flow alike at both ports plus impact noise: afloat in front of the breaking wave."""
    # Each row: frequency in Hz, left level in dB, right level in dB.
    wind_colour = [(12.04, 2, -5), (25, -5, -7), (45, -4.5, -6), (85, -4, -4.5), (130, -5, -5),
                   (192, -1.5, -2), (298, -8, -8.5), (444, -12, -13), (593, -9.5, -11.5), (674, -8, -11),
                   (785, -1.5, -16.5), (940, -7.5, -17), (1200, -17.5, -27.5)]
    # Each row: frequency in Hz, density in dB per Hz.
    spray_colour = [(1160, -6), (1600, -9.5), (2360, -9), (3150, -2), (3780, 0), (4380, -5), (4950, -12.5),
                    (6310, -14.5), (7200, -26.5), (8200, -33), (10400, -40), (12300, -37), (13500, -56)]
    # Likeness of the flow at the two ports. Each row: frequency in Hz, shared amplitude 0-1.
    calm_likeness = [(40, 1), (220, 1), (450, 0.94), (1000, 0.93)]
    out = flow(FLOAT, wind, eddies(lumpy_db=1.4, rate=48), wind_colour, calm_likeness, LAG_IN_AIR,
               top_hz=1250, rumble_db=1.5, buffet_db=-0.5, hollow_db=1.5)
    return out + white_water(water, spray_colour, drops,
                             drop_db=-10.5, flicker_db=0.55, splash_db=1.5, spray_db=-0.5)


def dive(wind):
    """Turbulence and bubble resonance under water: flow, churned air, fizz and a trapped bubble."""
    # Each row: frequency in Hz, left level in dB, right level in dB.
    flow_colour = [(12, -4, -6), (28, 3.5, 8.5), (60, 4, -3), (95, -2, -3), (138, -1, 2),
                   (244, -3.5, -10.5), (350, -10, -16), (504, -6.5, -12.5), (700, -6.5, -24),
                   (836, -15, -24), (1100, -15, -36)]
    # Likeness of the flow at the two ports. Each row: frequency in Hz, shared amplitude 0-1.
    submerged_likeness = [(40, 0.95), (140, 0.8), (300, 0.33), (800, 0.21)]
    churning = eddies(lumpy_db=1.5, rate=45) + gurgle(level_db=-7.0)
    out = flow(DIVE, under_water(wind, puff_share=0.46), churning, flow_colour, submerged_likeness, LAG_IN_WATER,
               top_hz=970, rumble_db=2.5, buffet_db=-2, hollow_db=-0.4, even_s=0.04)
    out += churned_air(level_db=1, froth_db=-6)
    out += fizz(level_db=1.5, pops_per_s=350, spread_db=3.5, froth_db=-7, ringing_db=-15)
    return out + trapped_air(hz=1680, level_db=-63.5)


def paddle(wind, air, water, drops):
    """Turbulent flow over the ports plus impact noise: wind and splashes after surfacing."""
    # Each row: frequency in Hz, left level in dB, right level in dB.
    wind_colour = [(12, 5, 2), (25, -14, -6), (45.3, 1, 6.5), (85, -5, -3), (132, -8, -5), (202, -7, -12),
                   (301, -10.5, -19), (436, -19.5, -22), (600, -20.5, -26), (680, -18, -25.5),
                   (820, -10, -27.5), (900, -16.5, -36), (1200, -34, -37)]
    out = flow(PADDLE, wind, air, wind_colour, GUSTY_LIKENESS, LAG_IN_AIR,
               top_hz=1360, rumble_db=2.0, buffet_db=-1.0, hollow_db=3)
    return out + white_water(water, SURFACE_SPRAY, drops,
                             drop_db=-7.5, flicker_db=1.13, splash_db=3.0, spray_db=-0.5)


def scene():
    """Superposition: ride, float, dive and paddle follow one another; the single events lie on top."""
    wind = wind_levels(rumble_hz=60, buffet_hz=230, hollow_hz=750, unrest_db=1.0)
    water = water_levels(unrest_db=1.13)
    drops = droplets()
    air = eddies(lumpy_db=1.3, rate=15.6)
    sea = ride(wind, air, water, drops) * during(RIDE)
    sea += afloat(wind, water, drops) * during(FLOAT)
    sea += dive(wind) * during(DIVE)
    sea += paddle(wind, air, water, drops) * during(PADDLE)
    sea += glugs() + hoots() + showers(level_db=3.5, pitch_spread=1.08)
    sea += ticks(tick_db=26.0, thud_db=1.0, port_hz=680, housing_hz=1300)
    return sea + plops(level_db=7.5) + thumps(level_db=2.5) + slaps(level_db=1.5)


def record(dry):
    """Band limits and soft saturation: the deepest bass is lost, peaks are rounded, the top is cut."""
    rounded = 1.155 * np.tanh(cut(dry, 17, "high") / 1.467)
    return cut(rounded, 13500, "low", order=14)


dry = scene()
out = record(dry)
write(out)
```